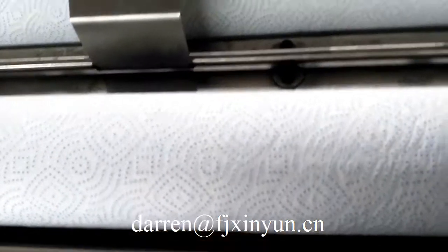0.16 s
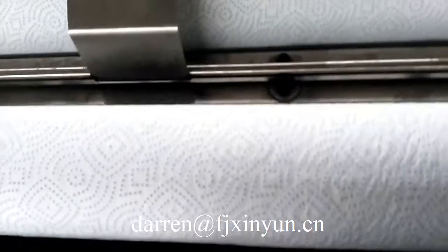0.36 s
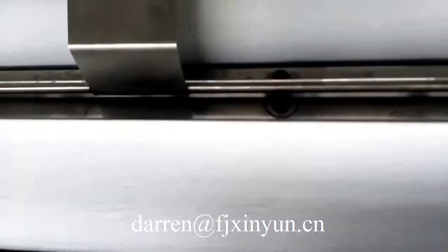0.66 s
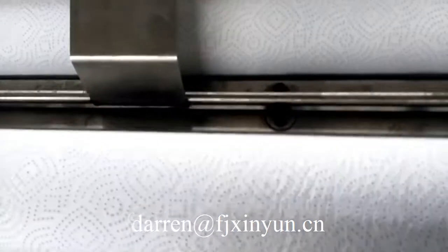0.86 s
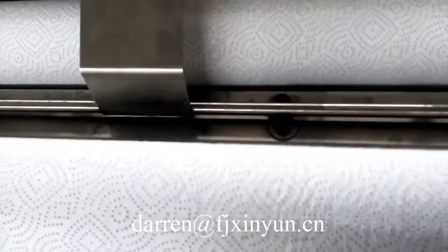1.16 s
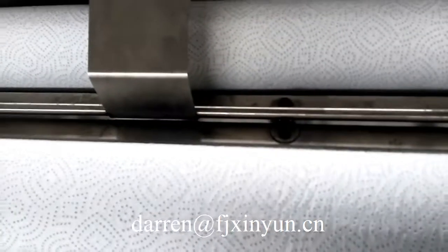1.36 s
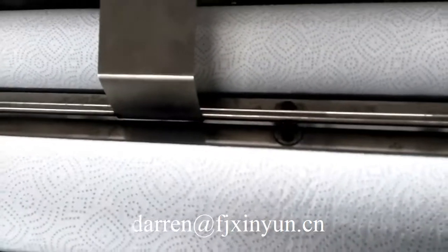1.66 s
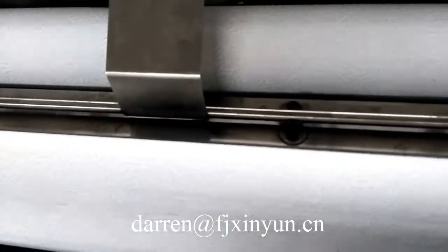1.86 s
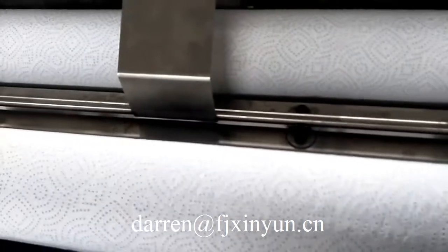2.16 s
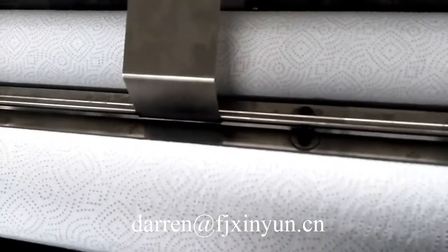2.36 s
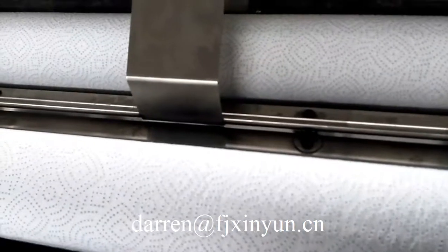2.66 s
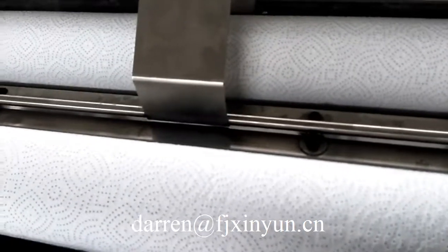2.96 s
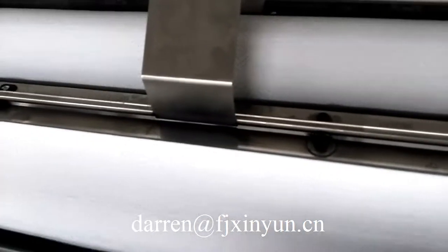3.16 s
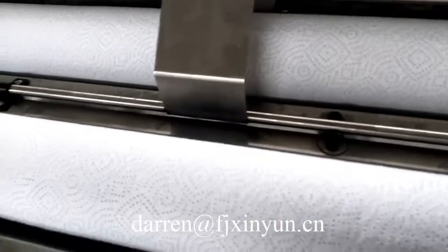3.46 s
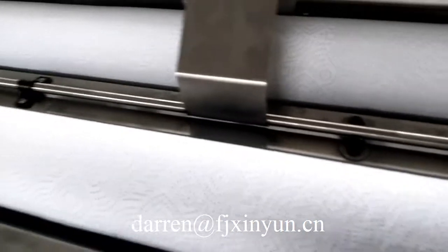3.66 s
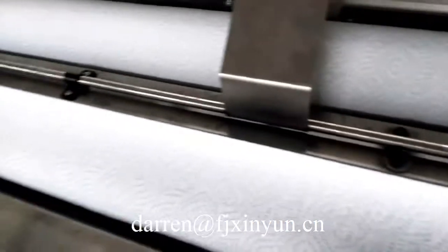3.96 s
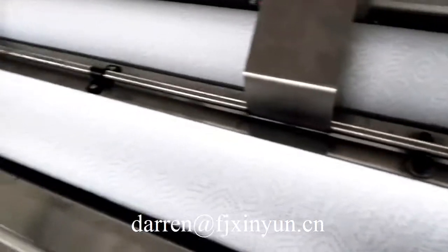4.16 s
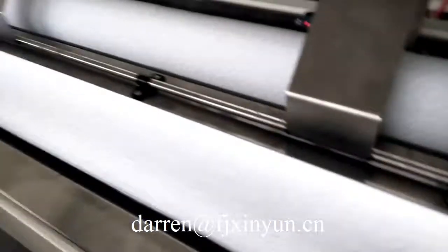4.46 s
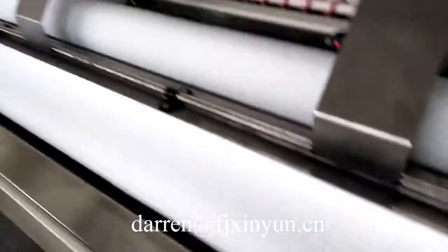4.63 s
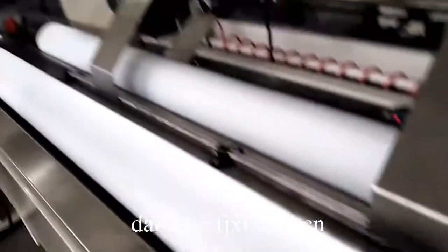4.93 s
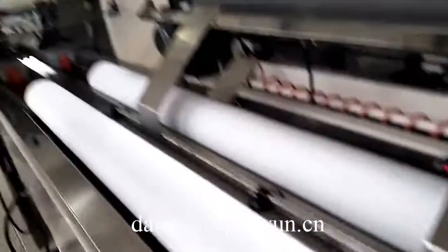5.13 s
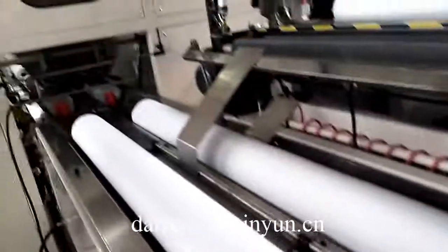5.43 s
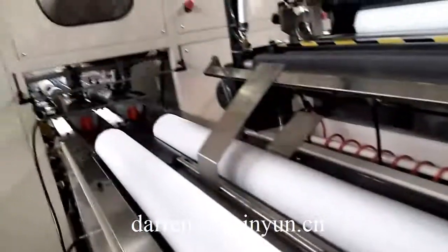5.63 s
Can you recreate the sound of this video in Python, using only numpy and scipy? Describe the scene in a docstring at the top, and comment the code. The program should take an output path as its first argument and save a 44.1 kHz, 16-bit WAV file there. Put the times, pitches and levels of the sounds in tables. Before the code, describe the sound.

Loud continuous machinery starts at once and is cut off still running: broad roar, shaking rumble, throbbing low hum and gritty grinding. Over it, gears whine in several harmonics, dipping and recovering with each feed stroke, and a cam clicks very fast with airy high puffs. Close, wide stereo in an indoor plant; in the last second the view turns to the drive end, knocks strengthen, hiss brightens and some ticks soften.

```python
"""A roaring, rumbling hall and a whining gear train open the scene: a paper rewinding line at speed.
Shaped noise makes roar, rumble, drone, rattle and grind; wavering sines make the drive hum, which swells in.
Gear mesh partials sag once per feed stroke; a cam shaft's decaying sines tick four times a turn,
and air and web hiss, noise in two bands, puffs with that shaft.
Two microphone ports drift along the line and late on swing toward the drive end."""
import sys
import numpy as np
from scipy import signal
from scipy.fft import rfft, irfft, next_fast_len
from scipy.io import wavfile
from scipy.ndimage import uniform_filter1d, map_coordinates

SR = 44100
rng = np.random.default_rng(int(sys.argv[2]) if len(sys.argv) > 2 else 0)


def to_wav(s):
    """Save 16-bit WAV."""
    ch = np.atleast_2d(s).T  # columns
    pcm = np.round(np.clip(ch, -1, 1) * 32767)  # PCM
    wavfile.write(sys.argv[1], SR, pcm.astype(np.int16))


def ratio_of_db(decibels):
    """Turn decibels (scalar or array-like) into linear amplitude factors; 0 dB maps to 1."""
    return 10 ** (np.asarray(decibels, float) / 20)


N = 255339

CAM_HZ = 5.276
TEETH = 48

# Swing of the ports toward the drive end. Each row: time in seconds, share 0-1.
FACING = [(0, 0.01), (4.9, 0), (5.06, 0.34), (5.2, 0.54), (5.5, 0.94), (5.79, 0.7)]


def along(points, hz):
    """(Hz, value) points on a log axis."""
    f, v = np.transpose(points)
    return np.interp(np.log(hz + 1), np.log(f + 1), v)


def curves(rows):
    """One value per sample for each column after the time."""
    s, *cols = np.transpose(rows)
    return [np.interp(np.arange(N) / SR, s, c) for c in cols]


def wobble(rate_hz):
    """A smooth random curve, rate_hz knots a second."""
    coarse = np.arange(0, N + 64, 64)
    knots = rng.standard_normal(int(N * rate_hz / SR) + 4)
    return np.interp(np.arange(N), coarse, map_coordinates(knots, [coarse * rate_hz / SR]))


def filtered(x, response):
    """x through a complex response of frequency."""
    m = next_fast_len(N + 8192)
    return irfft(rfft(x, m) * response(np.fft.rfftfreq(m, 1 / SR)), m)[..., :N]


def rush(spectrum, patchy_db):
    """Stereo noise of rms 1 with patches of random gain; the ports differ in likeness, phase and level."""
    # Likeness of the ports. Each row: frequency in Hz, correlation before phase and level differences.
    alike = [(60, 0.9), (150, 0.89), (300, 0.92), (600, 0.54), (1300, 0.24), (3000, 0.057), (5000, 0.044),
             (8000, 0.28), (12000, 0.97)]
    # Phase between the ports. Each row: frequency in Hz, left lead in radians.
    left_lead = [(300, 0), (520, 0.45), (1120, -3), (1810, -3), (2670, -8.5), (4480, -12), (6000, -12)]
    # Balance of the ports. Each row: frequency in Hz, left minus right in dB.
    tilt = [(60, 1), (150, 2), (370, 0.9), (800, 1), (1500, 1), (2500, 5.5), (4500, 2.5), (8000, 7.5),
            (13000, 4.5)]

    def mix(hz):
        angle = np.arccos(np.clip(along(alike, hz), -1, 1)) / 2
        return ratio_of_db(along(spectrum, hz)) * [np.cos(angle), np.sin(angle)]

    def port_split(hz):
        half = ratio_of_db(along(tilt, hz) / 2) * np.exp(.5j * along(left_lead, hz))
        return np.array([half, 1 / half])

    z = signal.stft(rng.standard_normal((2, N + 512)), nperseg=512)[2]
    field = uniform_filter1d(rng.standard_normal(z.shape[1:]), size=3, axis=0)
    field = uniform_filter1d(field, size=8, axis=1)
    patchy = z * ratio_of_db(patchy_db * field / field.std())
    pair = signal.istft(patchy, nperseg=512)[1][:, :N]
    same, other = filtered(pair, mix)
    out = filtered(np.array([same + other, same - other]), port_split)
    return out / out.std()


def tone(cycles, db, pan_db, lead_rad):
    """A stereo sine of given rms level, balance and phase lead."""
    side = np.array([[.5], [-.5]])
    phase = 2 * np.pi * (cycles + rng.random()) + side * lead_rad
    return np.sqrt(2) * ratio_of_db(db + side * pan_db) * np.sin(phase)


def placed(db, drift_db_per_s, facing_db):
    """Level of a layer in dB as the ports drift along the line and swing round."""
    return db + drift_db_per_s * np.arange(N) / SR + facing_db * curves(FACING)[0]


def hall():
    """The whole line in its hall: rumble, roar, drone, bearing rattle and grind, as shaped noise."""
    # Noise spectra. Each row: frequency in Hz, relative density in dB per Hz.
    rumble_spectrum = [(15, -50), (28, -34), (50, -2), (80, 2.5), (120, 0.5), (160, -10), (250, -53)]
    roar_spectrum = [(70, -54), (110, -15), (160, -6), (250, -5.5), (310, -2.5), (390, -3.5), (520, -7.5),
                     (640, -14.5), (850, -20.5), (1100, -42)]
    drone_spectrum = [(330, -44), (370, -7), (392, 1), (420, -3), (470, -41.5)]
    rattle_spectrum = [(500, -18), (750, -8), (930, 1), (1220, -1.5), (1350, -8), (1700, -15),
                       (2200, -38.5)]
    grind_spectrum = [(1100, -15.5), (1600, -4), (2040, -6), (2730, -0.5), (3100, -6), (3940, -9),
                      (4610, -10), (5500, -17), (6000, -19), (6700, -21.5), (7300, -18), (9000, -67)]
    # Base levels of rumble and drone. Each row: time in seconds, level in dB.
    rumble_level = [(0, -31), (2.0, -25.5), (4.6, -32), (5.4, -29.5), (5.79, -44)]
    drone_level = [(0, -26.5), (1.2, -25), (2.2, -40), (3.2, -29.5), (4.6, -24), (5.79, -28.5)]

    # the floor shakes in lumps that rumble and roar share
    lumps_db = 0.8 * wobble(8) + 1.0 * wobble(20)
    rumble_db = curves(rumble_level)[0] + lumps_db + 0.86 * wobble(3.7)
    roar_db = placed(-15.5, drift_db_per_s=-0.35, facing_db=0.08) + lumps_db
    drone_db = curves(drone_level)[0]
    rattle_db = placed(-25, drift_db_per_s=0.47, facing_db=3.4)
    grind_db = -24.5 + 0.29 * wobble(3.78)

    out = ratio_of_db(rumble_db) * rush(rumble_spectrum, patchy_db=1.1)
    out = out + ratio_of_db(roar_db) * rush(roar_spectrum, patchy_db=2.3)
    out = out + ratio_of_db(drone_db) * rush(drone_spectrum, patchy_db=1.5)
    out = out + ratio_of_db(rattle_db) * rush(rattle_spectrum, patchy_db=2.0)
    return out + ratio_of_db(grind_db) * rush(grind_spectrum, patchy_db=2.5)


def sag():
    """How far the gear speed has sagged, 0-1, down and up again once each feed stroke."""
    period_s, first_low_s, half_length_s = 1.28, .49, .2
    from_low_s = abs((np.arange(N) / SR - first_low_s + period_s / 2) % period_s - period_s / 2)
    return np.clip(1 - from_low_s / half_length_s, 0, 1)


def mesh_cycles():
    """Tooth contacts so far: the running sum of a mesh rate that drops by the sag."""
    full_speed_hz, depth_share = 895.95, .045
    return np.cumsum(full_speed_hz * (1 - depth_share * sag())) / SR


def whine_levels():
    """Order, level, balance and phase lead of each whine partial."""
    # Whine follows stroke load and place in the hall. Each row: time in seconds, base dB of orders 1-5.
    order_level = [(0.03, -30.0, -31.0, -35.0, -32.0, -41.0), (0.27, -31.0, -31.0, -34.5, -35.0, -39.0),
                   (0.49, -29.0, -46.0, -32.5, -38.0, -44.0), (0.71, -30.0, -38.0, -26.5, -36.0, -37.0),
                   (0.93, -31.0, -40.0, -24.5, -35.0, -35.0), (1.15, -32.0, -37.0, -24.5, -33.0, -35.0),
                   (1.35, -31.0, -32.0, -34.5, -32.0, -37.0), (1.55, -33.0, -32.0, -28.5, -31.0, -36.0),
                   (1.77, -28.0, -37.0, -33.5, -33.0, -43.0), (1.99, -26.0, -40.0, -27.5, -32.0, -37.0),
                   (2.21, -30.0, -38.0, -26.5, -34.0, -36.0), (2.43, -37.0, -34.0, -25.5, -36.0, -35.0),
                   (2.63, -30.0, -33.0, -30.5, -33.0, -37.0), (2.83, -29.0, -35.0, -33.5, -32.0, -37.0),
                   (3.05, -30.0, -36.0, -32.5, -34.0, -47.0), (3.27, -33.0, -37.0, -27.5, -36.0, -39.0),
                   (3.49, -34.0, -35.0, -24.5, -34.0, -39.0), (3.71, -33.0, -31.0, -26.5, -34.0, -38.0),
                   (3.91, -31.0, -34.0, -33.5, -35.0, -41.0), (4.11, -36.0, -33.0, -30.5, -35.0, -38.0),
                   (4.33, -29.0, -35.0, -32.5, -33.0, -51.0), (4.55, -30.0, -34.0, -25.5, -33.0, -38.0),
                   (4.77, -31.0, -38.0, -23.5, -32.0, -38.0), (4.99, -29.0, -34.0, -27.5, -30.0, -39.0),
                   (5.19, -24.0, -33.0, -30.5, -33.0, -46.0), (5.39, -27.0, -31.0, -29.5, -32.0, -42.0),
                   (5.61, -31.0, -26.0, -30.5, -36.0, -42.0), (5.76, -30.0, -27.0, -34.5, -37.0, -44.0)]
    # Each row: time in seconds, left minus right in dB of orders 1-5.
    order_pan = [(0.15, 1.0, 8.0, 4.0, 1.0, -4.0), (1.1, 6.0, 8.0, 3.0, 5.0, -10.0),
                 (2.4, -3.0, 6.0, -1.0, 0.0, -12.0), (3.7, -7.0, 10.0, -0.0, 3.0, -8.0),
                 (4.7, -5.0, 2.0, -1.0, -9.0, 4.0), (5.25, -1.0, 7.0, -5.0, -11.0, -13.0)]
    # Each row: time in seconds, base left lead in radians of orders 1-5.
    order_lead = [(0.15, 2.2, 2.1, -0.9, 2.1, -1.2), (1.1, 2.2, 1.7, -0.5, 3.0, 0.0),
                  (2.4, 1.5, 1.4, -0.4, 2.6, 1.0), (3.7, 1.0, 2.4, -0.6, 1.8, 1.2),
                  (4.7, -2.0, 2.6, 0.9, 4.1, 0.7), (5.25, -1.0, 3.2, 2.5, 3.6, -2.2)]
    # Faint partials. Each row: mesh order, dB relative to order 4, left minus right in dB,
    # base left lead in radians.
    faint = [(6, -17, 6, 2.2), (7, -19, 8, 1.5)]
    levels = curves(order_level)
    rows = list(zip(range(1, 6), levels, curves(order_pan), curves(order_lead)))
    return rows + [(order, levels[3] + db, pan_db, lead_rad) for order, db, pan_db, lead_rad in faint]


def whine(cycles):
    """Mesh orders throb once per turn of an uneven wheel."""
    # echoes lag behind a moving pitch: the tone blurs and breaks up
    gliding = np.minimum(4 * sag(), 1)
    out = 0
    for order, db, pan_db, lead_rad in whine_levels():
        throb = 1 + 0.33 * np.sin(2 * np.pi * (cycles / TEETH + rng.random()))
        port_flicker_db = (1.2 + 1.2 * gliding) * np.array([wobble(16), wobble(16)])
        shared_flicker_db = (2.4 + 1.6 * gliding) * wobble(32)
        flicker_db = port_flicker_db + shared_flicker_db - .3 - 1.6 * gliding
        blur_cycles = (0.07 + 0.05 * order * gliding) * wobble(35)
        wandering_lead_rad = lead_rad + 0.5 * wobble(9)
        out = out + throb * tone(order * cycles + blur_cycles, db + flicker_db, pan_db, wandering_lead_rad)
    return out


def knocks(cycles):
    """The uneven wheel knocks in its bearing once a turn, a noise burst from the housing."""
    # Bearing housing. Each row: frequency in Hz, relative density in dB per Hz.
    housing_spectrum = [(500, -26), (750, -13), (900, 1.5), (1050, 0), (1200, 2), (1350, -6), (1700, -16),
                        (2200, -40)]
    hard_knock_s, hard_knock_db = 5.515, 4.5  # one knock lands harder
    turns = (cycles - cycles[round(hard_knock_s * SR)]) / TEETH
    since = turns % 1  # in turns
    knock = (1 - np.exp(-since / 0.015)) * np.exp(-since / 0.18)
    knock = knock / np.sqrt(np.mean(knock ** 2))
    level_db = placed(-32.5, drift_db_per_s=-0.093, facing_db=8) + 3.9 * wobble(16)
    level_db = level_db + hard_knock_db * (turns // 1 == 0)
    return ratio_of_db(level_db) * knock * rush(housing_spectrum, patchy_db=1.0)


def gears():
    """Mesh whine and bearing knocks turn together."""
    cycles = mesh_cycles()
    return whine(cycles) + knocks(cycles)


def hum():
    """The drive hum swells once per roller turn; its second harmonic and other shafts add tones."""
    # Hum along the hall. Each row: time in seconds, base level in dB.
    hum_level = [(0, -49), (.5, -28), (1.05, -25.5), (1.35, -19.5), (2.4, -18.5), (3.2, -19.5),
                 (3.5, -27.5), (4.0, -30), (4.5, -60), (4.9, -29.5), (5.79, -26)]
    # Second harmonic. Each row: time in seconds, base level in dB.
    second_level = [(0.0, -19), (0.12, -34), (0.2, -18), (0.3, -32), (0.79, -29), (0.82, -18), (2.05, -32),
                    (3.3, -18.5), (3.39, -27), (3.95, -20), (5.06, -31), (5.22, -14), (5.47, -27.5),
                    (5.55, -19), (5.79, -19.5)]
    # Drive tones. Each row: frequency in Hz, base rms level in dB, left lead in radians.
    drive_tones = [(169.7, -34, -0.086), (300.5, -31, -0.3), (512, -33.5, 0.63), (1180, -41, 0.93),
                   (1238, -44, -0.91), (1253, -40.5, -2), (1160, -39, 2.5), (9038, -55, 0), (8905, -58, 0)]
    hum_hz, roller_hz = 159.0, 4.65
    t = np.arange(N) / SR

    swell = 1 + 0.45 * np.cos(2 * np.pi * roller_hz * (t - .12))
    hum_db = curves(hum_level)[0] + 2.2 * wobble(14)
    second_db = curves(second_level)[0] + 3.5 * wobble(22)
    out = swell * tone(hum_hz * t + 0.06 * wobble(12), hum_db, pan_db=1.5, lead_rad=0)
    out = out + tone(2 * hum_hz * t + 0.09 * wobble(25), second_db, pan_db=3.0, lead_rad=0)
    for hz, db, lead_rad in drive_tones:
        out = out + tone(hz * t + 0.11 * wobble(3.27), db + 1.3 * wobble(3.2), 1.5, lead_rad)
    return out


def cam():
    """Each contact rings a small steel part for a few ms, bounces once and stirs the frame."""
    # Contacts in one cam turn. Each row: nominal seconds into the turn, nominal Hz, base peak level in dB,
    # 60 dB decay in seconds, bounce in dB relative to the ring, dB gained facing the drive end.
    ticks = [(0.0424, 2480, -14.5, 0.0088, -1, -5.5), (0.09, 2890, -14, 0.011, -27, -28),
             (0.139, 2750, -16.5, 0.0088, -21, -9), (0.1864, 3050, -14.5, 0.0096, -34, -32)]
    out, t = np.zeros((2, N + SR)), np.arange(SR // 20) / SR
    near_db, facing = placed(-2.53, drift_db_per_s=1.31, facing_db=0), curves(FACING)[0]
    for turn in range(int(N / SR * CAM_HZ) + 1):
        for s, hz, db, t60_s, bounce_db, facing_db in ticks:
            size, pitch, late = rng.standard_normal(3)
            start = round((turn / CAM_HZ + s + .0003 * late) * SR)
            shape = (1 - np.exp(-t / 0.00049)) ** 2 * ratio_of_db(-60 * t / t60_s)
            ring = shape * np.sin(2 * np.pi * hz * (1 + .015 * pitch) * t)
            ring = ring / abs(ring).max()
            hit = ring + np.roll(ring, round(.0066 * SR)) * ratio_of_db(bounce_db)
            # nearby metal returns a short tail
            scatter = rng.standard_normal((2, len(t))) * ratio_of_db(-30.0 - 60 * t / 0.09)
            tail = signal.fftconvolve(ring[None], scatter, axes=1)[:, :len(t)]
            # the right port hears the hit 4 dB weaker and 16 samples earlier
            both = np.array([hit, ratio_of_db(-4) * np.roll(hit, -16)]) + tail
            at = min(start, N - 1)
            level_db = db + near_db[at] + facing_db * facing[at] + 1.2 * size
            out[:, start:][:, :len(t)] += ratio_of_db(level_db) * both
    return out[:, :N]


def hiss():
    """Air and web hiss in two bands, louder in short puffs tied to the cam."""
    # Noise spectra of the two bands. Each row: frequency in Hz, relative density in dB per Hz.
    hiss_spectrum = [(5500, -24), (6900, -12), (7740, -5), (8700, 4), (9500, -4.5), (10200, 2.5),
                     (10800, -18), (11300, -27), (12500, -40)]
    whistle_spectrum = [(10000, -40), (11100, -23), (11500, 3.5), (12000, 9.5), (12400, 0), (13000, -25),
                        (13500, -18), (14000, 0), (14250, -14), (14450, -60)]
    # Levels between puffs. Each row: time in seconds, lower hiss in dB, whistle band in dB.
    band_levels = [(0, -39, -42), (2.0, -39, -39), (2.4, -42, -44.5), (3.6, -39.5, -41), (4.9, -40, -42.5),
                   (5.5, -35, -35.5), (5.79, -33, -34.5)]
    # Puffs in one cam turn. Each row: centre in seconds into the turn, Gaussian spread in seconds,
    # nominal gain in dB of the lower hiss, of the whistle band.
    puffs = [(.007, 0.0035, 2, 6), (0.025, 0.0055, 1.5, 8), (0.071, 0.0082, -1, 6), (0.107, 0.003, 4, 9),
             (0.119, 0.0072, -0.5, 6.5), (0.15, 0.0053, 2, 5), (0.161, 0.019, 4, 5)]
    hiss_db, whistle_db = curves(band_levels)
    into_s = np.arange(N) / SR % (1 / CAM_HZ)
    for centre_s, spread_s, low_db, high_db in puffs:
        puff = np.exp(-.5 * ((into_s - centre_s) / spread_s) ** 2) * (1 + 0.25 * wobble(5.15))
        hiss_db = hiss_db + low_db * puff
        whistle_db = whistle_db + high_db * puff
    low = ratio_of_db(hiss_db + 0.48 * wobble(3.34)) * rush(hiss_spectrum, patchy_db=2.5)
    high = ratio_of_db(whistle_db + 0.28 * wobble(3.1)) * rush(whistle_spectrum, patchy_db=0.0)
    return low + high


def scene():
    """All sources at the two ports."""
    return hall() + gears() + hum() + cam() + hiss()


def top_cut(x):
    """Nothing passes above the cut-off."""
    return signal.sosfilt(signal.butter(12, 14230, fs=SR, output="sos"), x)


def record(dry):
    """The loudest peaks round off at full scale."""
    rounded = dry / (1 + abs(dry) ** 12) ** (1 / 12)
    return top_cut(rounded)


dry = scene()
out = record(dry)
to_wav(out)
```